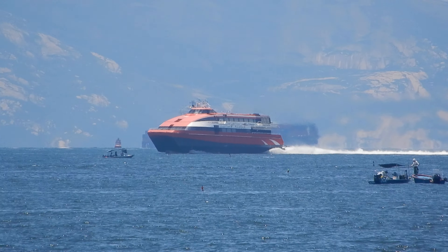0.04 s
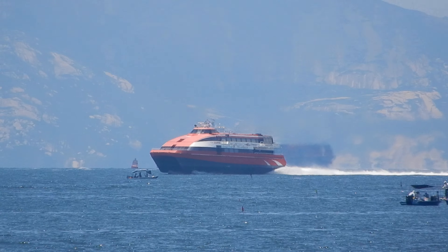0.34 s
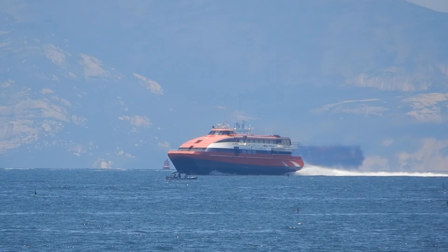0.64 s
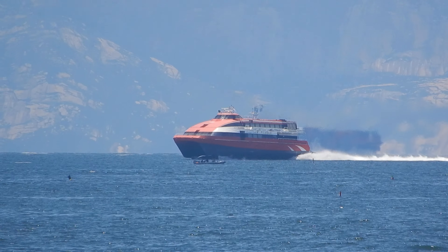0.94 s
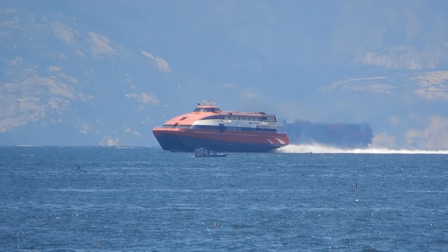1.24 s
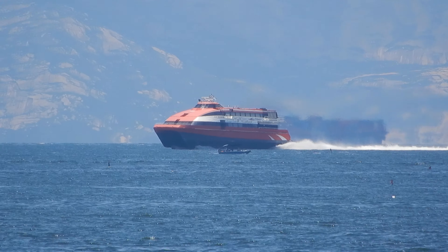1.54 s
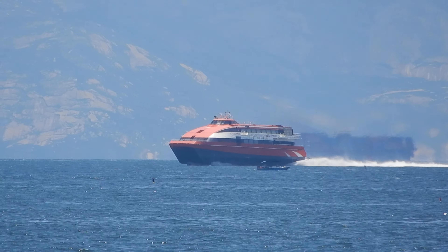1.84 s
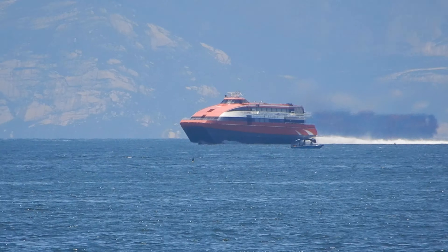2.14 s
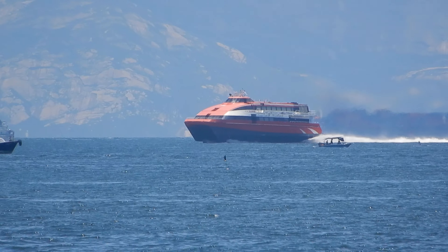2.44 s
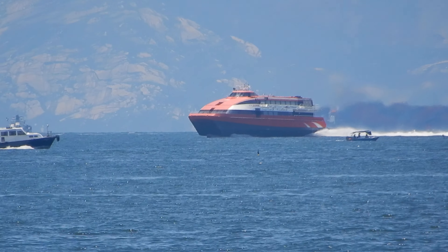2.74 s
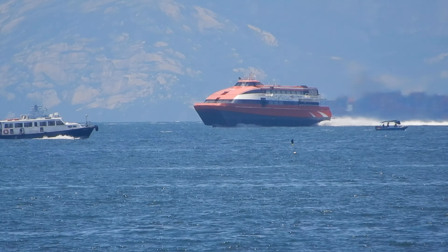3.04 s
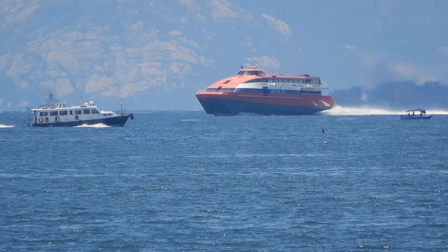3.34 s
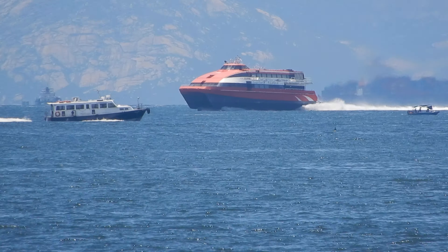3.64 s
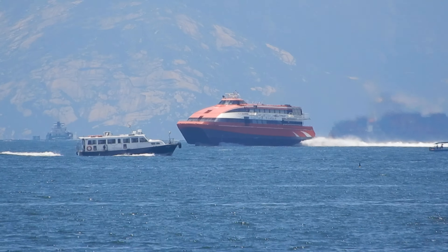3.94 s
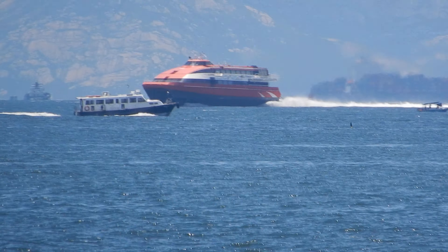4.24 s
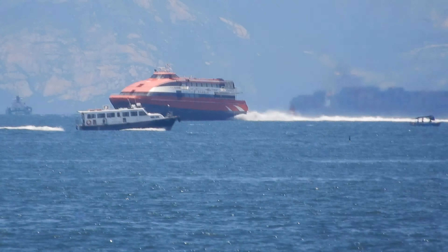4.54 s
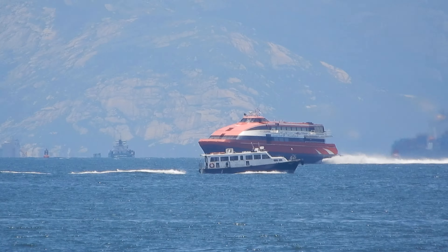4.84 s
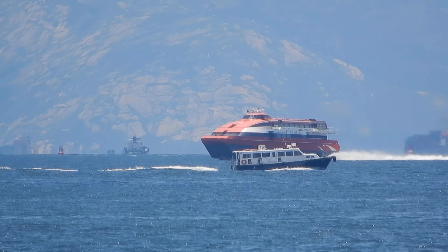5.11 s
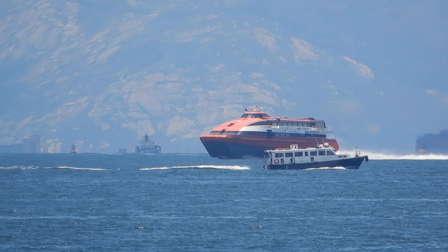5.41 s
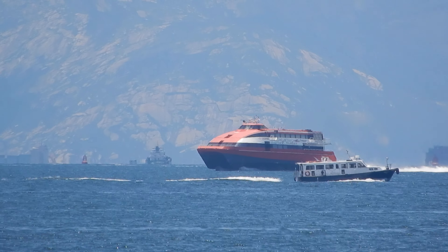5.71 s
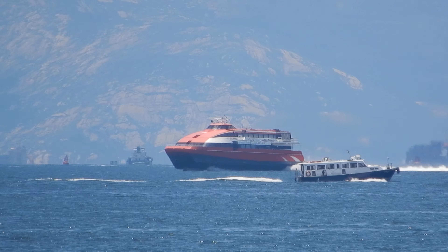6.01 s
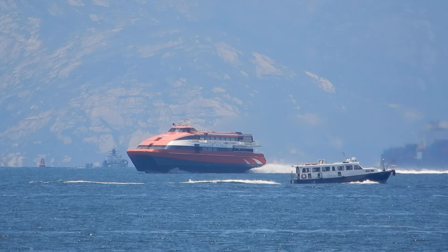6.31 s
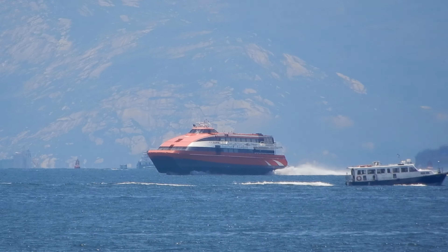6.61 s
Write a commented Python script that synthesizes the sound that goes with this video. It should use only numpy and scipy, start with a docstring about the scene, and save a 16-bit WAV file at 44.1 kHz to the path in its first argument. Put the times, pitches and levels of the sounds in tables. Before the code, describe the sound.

A distant fast ferry gives a steady low hum and even engine roar, while gusty wind rumbles and flutters on the microphone.

```python
"""An even roar of turbines and wake carries over open water from a distant fast ferry.
Its engine hum, harmonics of one steady cycle, swells and fades with the gusts.
Close by, eddies rumble, flutter, crackle and pop on the two microphone ports and ring the
cavities behind them. A thin whine comes and goes, and a few dry ticks sound late on."""
import sys
import numpy as np
from scipy import signal
from scipy.fft import rfft, irfft, next_fast_len
from scipy.io import wavfile

SR = 44100
rng = np.random.default_rng(int(sys.argv[2]) if len(sys.argv) > 2 else 0)


def output_pcm(signal):
    """Save a mono or channel-first signal as 16-bit PCM at the path in sys.argv[1].

    Samples are clipped to [-1, 1] before scaling.
    """
    pcm = np.clip(np.atleast_2d(signal).T, -1, 1) * 32767
    wavfile.write(sys.argv[1], SR, np.round(pcm).astype(np.int16))


N = 298557

# Turbines and wake, swelling with distance and moving air.
# Each row: time in seconds, roar level in dB, spray hiss level in dB.
ROAR_LEVELS = [(0, -27.5, -43), (0.42, -30.5, -45), (0.65, -27.5, -42.8), (1.38, -33.5, -48),
               (1.65, -29.5, -43.5), (2.2, -26, -43), (2.4, -28.5, -44), (2.87, -30, -44.5),
               (3.6, -33, -47), (4.17, -28.5, -43), (4.55, -34.5, -49.5), (5.75, -36, -48.5),
               (6.25, -36.5, -50), (6.62, -31.5, -46.5)]
# Sudden dips of roar and hiss. Each row: start in seconds, nominal depth in dB.
ROAR_DIPS = [(0.77, 4), (2.25, 4), (2.89, 7.5), (4.95, 9), (6.64, 6)]
# Noise spectra of the ship. Each row: frequency in Hz, relative density in dB.
EXHAUST_SPECTRUM = [(150, -7), (400, 14), (600, 8.5), (850, 7), (1400, 12.5), (2000, 8), (2600, 2),
                    (3500, 2.5), (4000, -7.5), (4400, -5.5), (5200, -15), (7000, -18)]
SPRAY_SPECTRUM = [(2000, 10.5), (4500, 8.5), (6200, 8), (6700, 3), (7500, 4.5), (10000, 2), (13000, -1.5),
                  (15500, -3.5)]
# Faint machinery tones. Each row: frequency in Hz, relative level in dB.
MACHINERY_TONES = [(2122, -52), (3106, -59), (3510, -60)]
# Harmonics of the hum. Each row: multiple of the engine cycle, relative level in dB.
ENGINE_ORDERS = [(1, -31.5), (2, -24.5), (4, 0.5), (5, -29), (6, -17.5), (7, -22.5), (8, -16), (9, -4),
                 (10, -44), (11, -39), (13, -18), (16, -22), (17, -53)]
# The low hum between gusts. Each row: time in seconds, gain in dB.
HUM_LEVELS = [(0, -34.5), (1.0, -27), (2.0, -26), (4.4, -23), (5.0, -23.5), (5.45, -35), (5.7, -30),
              (6.77, -25)]
# The breeze under the gusts. Each row: time in seconds, relative strength in dB, flutter level in dB.
BREEZE_LEVELS = [(0, 0, -28), (0.5, 1.5, -28.5), (2.4, -2.3, -29), (4.4, 0.4, -31), (5.3, -3, -31.5),
                 (5.55, -5, -31.5), (6.0, -5, -32), (6.77, 3.2, -33.5)]
# Gusts. Each row: time of full strength and hold in seconds, rise in dB, rise of the rumble in dB.
GUST_SWELLS = [(0.26, 0.081, 6.5, -9), (0.904, .3, 5, -10), (1.505, 0.026, 6, -2), (1.923, 0.39, 9, 0),
               (2.514, 0.34, 9.5, -3), (3.236, 0.17, 6, 0), (3.53, 0.015, 7.5, 4), (3.684, .5, 7, -8),
               (4.25, 0.2, 9, 9), (4.524, 0.37, 6.5, 16), (5.26, 0.025, 6, 5), (6.11, 0.04, 13.5, 22.5),
               (6.567, 0.055, 9, 14)]
# Wind direction. Each row: time in seconds, incidence from 0 (head-on) to 1 (grazing the ports).
WIND_INCIDENCE = [(0, 0.92), (.4, 0.26), (4.5, 0.035), (5.05, 0.26), (5.5, 0.97), (6.1, 0.84), (6.35, 0),
                  (6.6, 0.34)]
# Wind spectra by eddy size. Each row: frequency in Hz, relative density in dB.
LARGE_EDDY_SPECTRUM = [(22, -23), (40, -30), (62, -8.5), (80, -6.5), (100, -7.5), (150, -9.5)]
MEDIUM_EDDY_SPECTRUM = [(80, -34), (130, -2), (170, -5.5), (240, -4), (320, -5.5), (420, -13), (560, -20),
                        (900, -26.5)]
SMALL_EDDY_SPECTRUM = [(250, 6.5), (400, -11), (550, 2.5), (850, -1.5), (1150, -4), (1500, -20.5),
                       (2200, -14.5), (4000, -21)]
# Modes of the cavity behind each port. Each row: frequency in Hz, bandwidth in Hz, relative gain in dB.
CAVITY_MODES = [(522, 110, 16.5), (690, 240, 8), (1056, 310, 10)]
# Spells of whine. Each row: time of full strength in seconds, hold in seconds, relative level in dB.
WHINE_SWELLS = [(0.082, .16, -3), (0.54, .11, -7), (0.91, .13, -4), (1.44, 0.61, -4), (1.845, 0.59, -1.5),
                (2.784, 0.46, -1), (3.493, .13, -1), (3.743, 1.95, -2), (5.686, 1.01, 1)]
# The strongest eddies. Each row: time in seconds, relative peak in dB, ring frequency in Hz.
EDDY_POPS = [(0.113, -6, 685), (0.126, -10, 1030), (0.297, -4.5, 730), (0.612, -9.5, 1030),
             (0.656, -7, 520), (0.696, -5, 587), (0.764, -2.5, 760), (0.942, -9, 670), (1.083, -8, 530),
             (1.225, -4.5, 597), (1.278, -10, 553), (1.326, -1.5, 510), (1.682, -7.5, 915), (1.81, -7, 656),
             (2.079, -7, 600), (2.231, -6.5, 640), (2.279, -7.5, 597), (2.329, -5, 574), (2.699, -5.5, 570),
             (2.879, -2.5, 524), (2.892, -6, 814), (3.034, -2.5, 524), (3.483, -7, 740), (3.565, -3.5, 544),
             (3.643, -11, 726), (3.92, -7, 830), (4.487, -11, 553), (4.888, -5.5, 520), (4.954, -6, 690),
             (5.047, -11.5, 1110), (5.14, -9.5, 684), (5.36, -10, 1100), (5.787, -9, 1160),
             (5.848, -10.5, 1170), (6.052, -10, 1140), (6.107, -11.5, 655), (6.16, -11, 890),
             (6.199, -11.5, 1040), (6.244, -11, 1090), (6.32, -10.5, 573), (6.64, -6.5, 775)]
# Small dry ticks. Each row: start in seconds, relative peak in dB.
DRY_TICKS = [(5.378, -8), (5.388, -8), (5.458, -8.5), (5.472, -16), (5.489, -16)]

TIME = np.arange(N) / SR
SIDES = np.array([[1], [-1]])  # left, right


def from_db(db):
    """Amplitude grows tenfold for every 20 dB."""
    return 10 ** (np.asarray(db) / 20)


def unit_power(x):
    """Dividing a signal by its RMS value gives it unit power."""
    return x / np.sqrt(np.mean(x ** 2) + 1e-20)


def curves(rows):
    """Linear interpolation gives each column after the time one value per sample."""
    times, *columns = np.transpose(rows)
    return [np.interp(TIME, times, column) for column in columns]


def drift(rate_hz):
    """Low-passed noise is a slow random fluctuation, here of unit spread."""
    step, settling = 40, 2000
    pole = np.exp(-2 * np.pi * step * rate_hz / SR)
    noise = rng.standard_normal(N // step + settling + 2)
    slow = signal.lfilter([1], [1, -2 * pole, pole * pole], noise)[settling:]
    return np.interp(np.arange(N) / step, np.arange(len(slow)), unit_power(slow))


def swells(rows, attack_s, release_s):
    """The envelope of overlapping trapezoids follows the highest one."""
    shapes = []
    for full_s, hold_s, height in rows:
        age = TIME - full_s
        shapes.append(height * np.clip(np.minimum(1 + age / attack_s, 1 - (age - hold_s) / release_s), 0, 1))
    return np.max(shapes, axis=0)


def stereo(noises, correlation):
    """The sum and difference of two independent noises are partly correlated."""
    return np.sqrt((1 + correlation) / 2) * noises[0] + np.sqrt((1 - correlation) / 2) * noises[1] * SIDES


def coloured(spectrum, correlation):
    """Spectral weighting colours stereo noise; beyond the table it falls 24 dB per octave."""
    size = next_fast_len(N)
    octave = np.log2(np.maximum(np.fft.rfftfreq(size, 1 / SR), 1))
    hz, db = np.transpose(spectrum)
    outside = np.abs(octave - np.clip(octave, np.log2(hz[0]), np.log2(hz[-1])))
    gain = from_db(np.interp(octave, np.log2(hz), db) - 24 * outside)
    noises = irfft(rfft(rng.standard_normal((2, size))) * gain, size)[:, :N]
    return unit_power(stereo(noises, correlation))


def resonate(x, hz, width_hz):
    """A damped two-pole resonator passes a band, with unit gain at its peak."""
    r = np.exp(-np.pi * width_hz / SR)
    feedback = [1, -2 * r * np.cos(2 * np.pi * hz / SR), r * r]
    return signal.lfilter(np.array([1, 0, -1]) * (1 - r * r) / 2, feedback, x)


def tones(rows, jitter_rad, jitter_hz):
    """Random phase modulation slightly broadens each spectral line."""
    return sum(from_db(db) * np.sin(2 * np.pi * hz * TIME + jitter_rad * drift(jitter_hz))
               for hz, db in rows)


def distant_levels(fall_s=0.017, recovery_s=0.13):
    """Distance and moving air vary the roar and hiss, in dB; sudden dips recover exponentially."""
    dip_db = 0
    for start_s, depth_db in ROAR_DIPS:
        age = np.maximum(TIME - start_s, 0)
        dip_db += depth_db * np.minimum(age / fall_s, 1) * np.exp(-age / recovery_s)
    return [level_db - dip_db for level_db in curves(ROAR_LEVELS)]


def turbine_roar(tones_db, churn_db):
    """Exhaust and wake noise reaches both ports coherently, while the spray hiss is diffuse."""
    roar_db, spray_db = distant_levels()
    exhaust = from_db(roar_db + churn_db * drift(15)) * coloured(EXHAUST_SPECTRUM, correlation=0.92)
    hiss = from_db(spray_db) * coloured(SPRAY_SPECTRUM, correlation=0.14)
    machinery = tones(MACHINERY_TONES, jitter_rad=1.54, jitter_hz=4.3)
    return exhaust + hiss + machinery * from_db(tones_db + roar_db - roar_db.mean())


def gust_rises():
    """Faster air makes stronger pressure fluctuations: the rise in dB of the wind and of its rumble."""
    full_s, hold_s, *rises = np.transpose(GUST_SWELLS)
    return [swells(zip(full_s, hold_s, rise), attack_s=0.084, release_s=0.17) for rise in rises]


def engine_hum(cycle_hz, wander, waver_db, overtone_db, fade_db):
    """A periodic cycle radiates harmonics. All swell with the gusts; the upper ones also fade singly."""
    gust_db, _ = gust_rises()
    breeze_db, _ = curves(BREEZE_LEVELS)
    lower_db = curves(HUM_LEVELS)[0] + 0.81 * gust_db + waver_db * drift(13)
    upper_db = overtone_db + 0.92 * (breeze_db + gust_db)
    cycle_phase = 2 * np.pi * np.cumsum(cycle_hz * (1 + wander * drift(0.45))) / SR
    firing_order, _ = max(ENGINE_ORDERS, key=lambda row: row[1])
    out = np.zeros((2, N))
    for order, db in ENGINE_ORDERS:
        if order <= firing_order:
            swell_db, jitter_rad = lower_db, 0.32
        else:
            swell_db, jitter_rad = upper_db + fade_db * drift(8.8), 0.45
        phase = order * cycle_phase + rng.uniform(0, 2 * np.pi) + jitter_rad * drift(9.8)
        out += from_db(db + swell_db) * np.sin(phase)
    return np.sqrt(2) * out


def port_cavity(pressure, colour):
    """Pressure at a port excites the resonant modes of the cavity behind it."""
    ringing = sum(from_db(db) * resonate(pressure, hz, width) for hz, width, db in CAVITY_MODES)
    return pressure + colour * ringing


def wind(rumble_db, buffet_db, lumpy_db, ragged_db):
    """Coherence grows with eddy size: large eddies cover both ports, small ones hit each separately."""
    gust_db, deep_db = gust_rises()
    breeze_db, flutter_db = curves(BREEZE_LEVELS)
    incidence, = curves(WIND_INCIDENCE)
    rumble = from_db(rumble_db + breeze_db + deep_db) * coloured(LARGE_EDDY_SPECTRUM, correlation=0.63)
    lumps = coloured(MEDIUM_EDDY_SPECTRUM, correlation=0.59) * from_db(lumpy_db * drift(36.5))
    buffet = from_db(buffet_db + breeze_db + gust_db) * unit_power(lumps)
    bursts = from_db(ragged_db * (drift(30) + 0.35 * np.array([drift(80), drift(110)])))
    pressure = coloured(SMALL_EDDY_SPECTRUM, correlation=0.2) * bursts
    eddies = unit_power(port_cavity(pressure, colour=0.57))
    # grazing air shifts part of the flutter up to a higher resonance
    bright_share = 0.16 * incidence
    bright = unit_power(resonate(eddies, hz=1610, width_hz=300))
    flutter = np.sqrt(1 - bright_share) * eddies + np.sqrt(bright_share) * bright
    return rumble + buffet + from_db(flutter_db + 0.43 * gust_db) * flutter


def grazing_crackle(max_per_s, level_db, spread_db, decay_s, hz, width_hz, top_hz, pan_db):
    """Vortex shedding: air grazing the ports sheds tiny eddies at random, snapping louder in a gust."""
    gust_db, _ = gust_rises()
    incidence, = curves(WIND_INCIDENCE)
    births = rng.random(N) < max_per_s * incidence / SR
    sizes = from_db(spread_db * np.minimum(rng.exponential(1, (2, N)), 3))
    envelope = signal.lfilter([1], [1, -np.exp(-1 / (decay_s * SR))], births * sizes + 1e-18)
    eddies = stereo(rng.standard_normal((2, N)), correlation=0.17) * envelope
    band = resonate(resonate(eddies, hz, width_hz), hz, width_hz)
    lowpass = signal.butter(4, top_hz, fs=SR, output="sos")
    snaps = signal.sosfilt(lowpass, port_cavity(band, colour=0.7))
    return unit_power(snaps) * from_db(level_db + 0.4 * gust_db + SIDES * pan_db / 2)


def whine(level_db, hz, width_hz, flicker_db, lull_db):
    """Narrow-band noise around a few lines is heard as a pitch; it comes in spells and follows the hiss."""
    _, spray_db = distant_levels()
    rows = [(full_s, hold_s, from_db(db)) for full_s, hold_s, db in WHINE_SWELLS]
    spells = np.maximum(swells(rows, attack_s=0.058, release_s=0.087), from_db(lull_db))
    noise = stereo(rng.standard_normal((2, N)), correlation=0.28)
    band = unit_power(resonate(resonate(noise, hz, width_hz), hz, width_hz))
    lines = np.sqrt(2) * tones(WHINE_TONES, jitter_rad=0.79, jitter_hz=6.8)
    return spells * from_db(spray_db + level_db + flicker_db * drift(30)) * (band + lines)


def eddy_pops(level_db, rise_s, decay_s, ring_width_hz, grazing_pan_db):
    """Impulse excitation: an eddy bursts on a port as a dull puff and leaves a short hollow ring."""
    out = np.zeros((2, N + SR))
    t = np.arange(SR // 8) / SR - 0.03
    from_peak_s = t - 0.0012
    envelope = np.exp(np.minimum(from_peak_s / rise_s, -from_peak_s / decay_s))
    for time_s, db, ring_hz in EDDY_POPS:
        # grazing air favours the right port
        pan_db = grazing_pan_db * np.interp(time_s, *np.transpose(WIND_INCIDENCE)) + rng.standard_normal()
        # large, low eddies are the dullest
        band = signal.butter(2, [220, 600 + 1.43 * ring_hz], "band", fs=SR, output="sos")
        burst = stereo(rng.standard_normal((2, len(t))), correlation=0.16) * envelope
        puff = signal.sosfilt(band, signal.sosfilt(band, burst))
        ring = unit_power(resonate(puff, ring_hz, ring_width_hz))
        pop = 0.88 * unit_power(port_cavity(puff, colour=0.48)) + ring
        pop /= np.abs(pop).max(axis=1, keepdims=True)
        start = round((time_s + t[0]) * SR)
        out[:, start:start + len(t)] += pop * from_db(db + level_db + SIDES * pan_db / 2)
    return out[:, :N]


def ticks(level_db, decay_s, band_hz):
    """A brief transient has a broad spectrum: each nearby snap rings all the cavity modes."""
    out = np.zeros((2, N))
    t = np.arange(SR // 20) / SR
    band = signal.butter(2, band_hz, "band", fs=SR, output="sos")
    for start_s, db in DRY_TICKS:
        crack = stereo(rng.standard_normal((2, len(t))), correlation=0.071) * np.exp(-t / decay_s)
        snap = port_cavity(signal.sosfilt(band, signal.sosfilt(band, crack)), colour=1.0)
        start = round(start_s * SR)
        out[:, start:start + len(t)] += from_db(db + level_db) * snap / np.abs(snap).max()
    return out


def scene():
    """Superposition: the pressures of the distant ship and the nearby wind and ticks add."""
    ship = engine_hum(cycle_hz=30.985, wander=0.00057, waver_db=2.1, overtone_db=-27.5, fade_db=4.0)
    ship += turbine_roar(tones_db=1.5, churn_db=1.28)
    ship += whine(level_db=-1.5, hz=5940, width_hz=220, flicker_db=1.0, lull_db=-22)
    air = wind(rumble_db=-37, buffet_db=-26.5, lumpy_db=3.5, ragged_db=4.0)
    air += eddy_pops(level_db=-1.04, rise_s=0.0038, decay_s=0.0056, ring_width_hz=170, grazing_pan_db=-11)
    air += grazing_crackle(max_per_s=80, level_db=-40.5, spread_db=3.0, decay_s=0.0017,
                           hz=1190, width_hz=1170, top_hz=2600, pan_db=-4.0)
    return ship + air + ticks(level_db=0.5, decay_s=0.0037, band_hz=(500, 3340))


def record(dry, ceiling=0.95, cutoff_hz=15750):
    """Soft saturation rounds the highest peaks, and a steep low-pass filter cuts the top."""
    limited = dry / (1 + np.abs(dry / ceiling) ** 6) ** (1 / 6)
    return signal.sosfilt(signal.ellip(12, 0.1, 90, cutoff_hz, fs=SR, output="sos"), limited)


# Lines inside the whine. Each row: frequency in Hz, level in dB relative to the noise band.
WHINE_TONES = [(5735, -20), (5846, -10), (5894, -10), (6185, -22)]

dry = scene()
out = record(dry)
output_pcm(out)
```